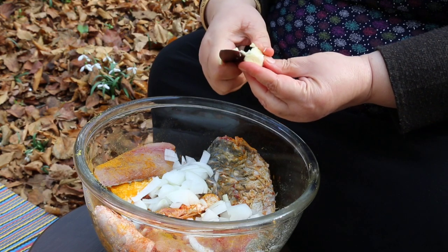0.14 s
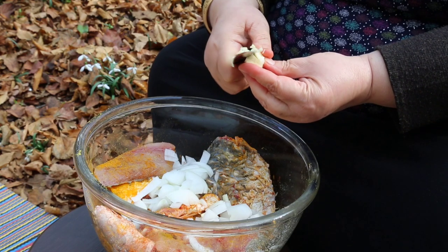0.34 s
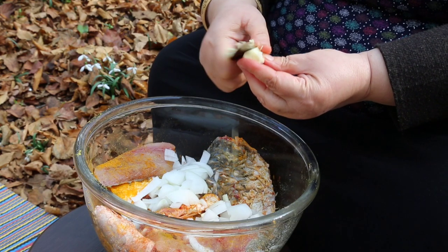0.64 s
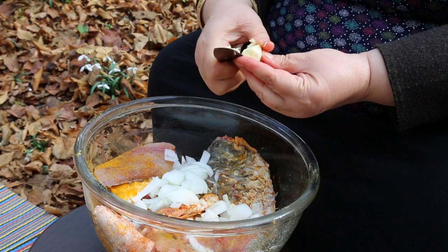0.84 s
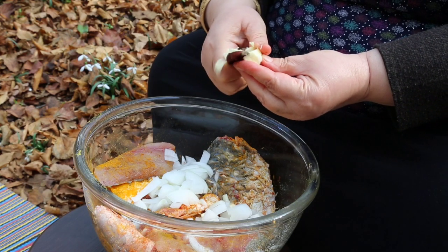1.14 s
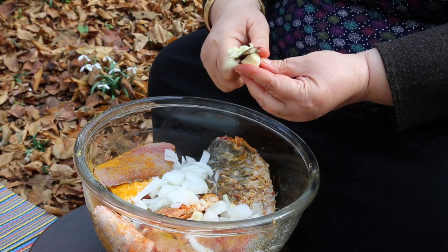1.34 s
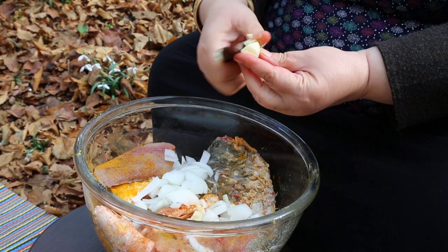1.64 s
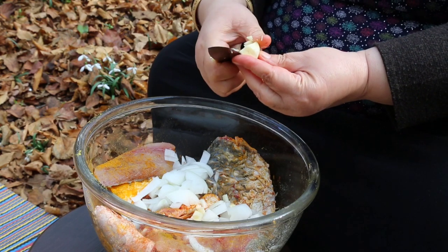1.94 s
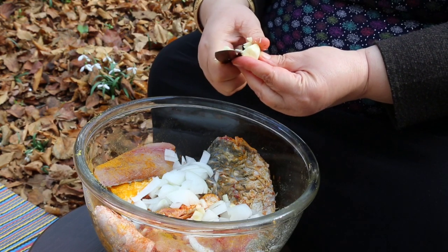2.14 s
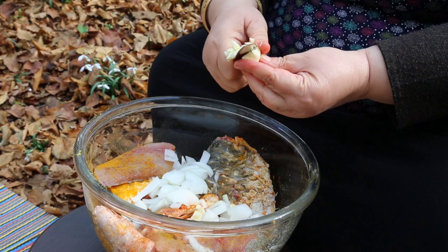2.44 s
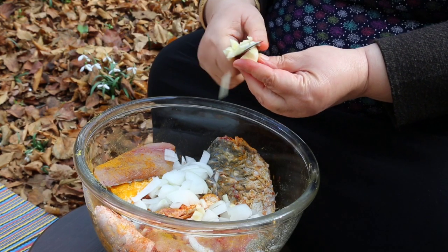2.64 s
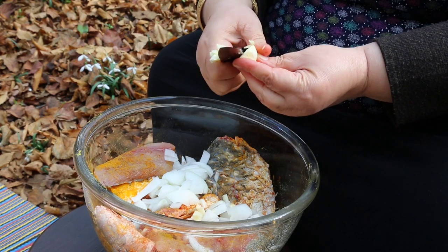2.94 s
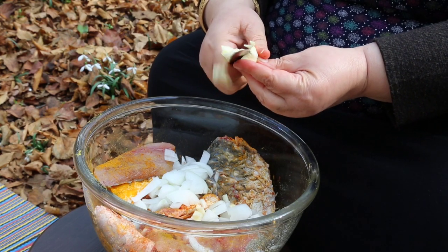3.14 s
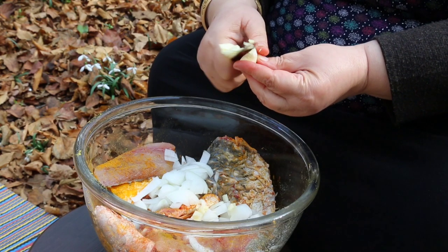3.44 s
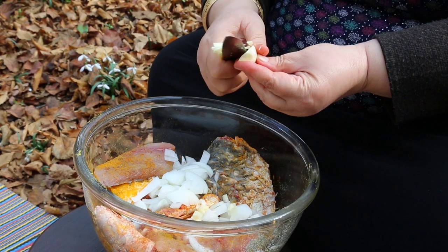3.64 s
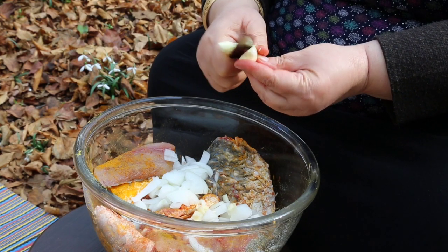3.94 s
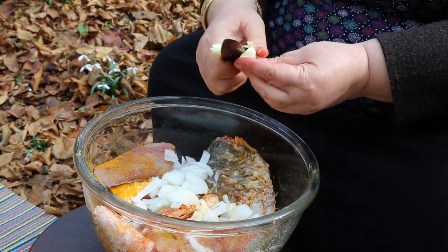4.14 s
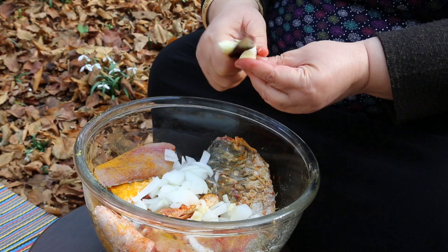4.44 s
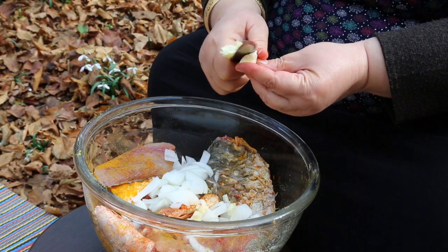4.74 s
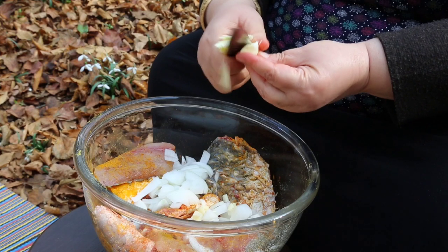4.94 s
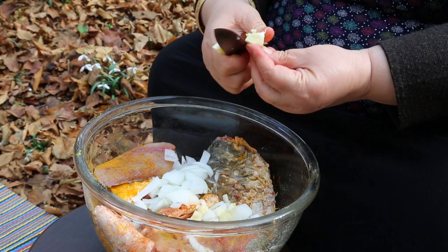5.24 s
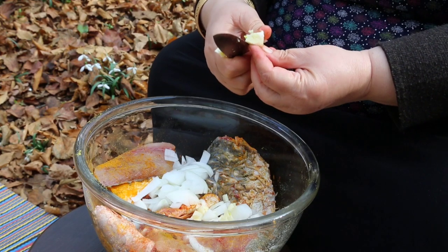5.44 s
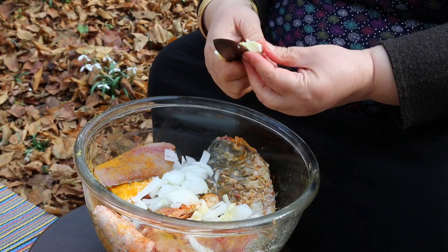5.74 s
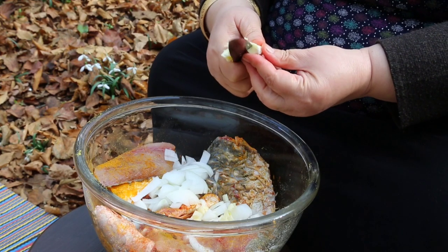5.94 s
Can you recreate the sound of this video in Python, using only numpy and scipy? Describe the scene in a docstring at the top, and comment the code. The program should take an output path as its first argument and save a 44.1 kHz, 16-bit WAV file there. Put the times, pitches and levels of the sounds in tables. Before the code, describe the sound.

Close by, a knife cuts through a clove of garlic in short runs of quiet, moist crunching and small clicks. Around it, woodland birds warble and chirp at different distances, scattered at first, then nearer and busier, with two sharp high calls midway. The birds stand out over the cutting and a soft outdoor background of air and distant leaves.

```python
"""Woodland birds warble quick whistled glides, with hazy trills and thin high calls among them.
Each note is a frequency-modulated tone, smeared by sound scattered off the trunks. Close by, at a
picnic, a knife slices a garlic clove: bursting cells crackle wetly and tough fibres snap.
Under it lie rumbling air, microphone hiss, murmuring leaves, a far drone, a faint electric whine
and soft wind bumps."""
import sys
import numpy as np
from scipy import signal
from scipy.fft import rfft, irfft, next_fast_len
from scipy.io import wavfile
from scipy.ndimage import uniform_filter1d, map_coordinates

SR = 44100
rng = np.random.default_rng(int(sys.argv[2]) if len(sys.argv) > 2 else 0)


def put_to_file(sound):
    """Save the sound as 16-bit audio at rate SR, in the file named by the first command-line argument."""
    columns = np.atleast_2d(sound).T  # one column per channel
    safe = np.clip(columns, -1, 1)
    whole_steps = np.round(safe * 32767)
    wavfile.write(sys.argv[1], SR, whole_steps.astype(np.int16))


N = 268114
TIME = np.arange(N) / SR


def amp(db):
    return 10 ** (np.asarray(db) / 20)


def curves(rows):
    """Linear interpolation in time: one value per sample for each column after the first."""
    times, *columns = np.transpose(rows)
    return [np.interp(TIME, times, column) for column in columns]


def wobble(rate):
    """Smooth random modulation: a spline through `rate` Gaussian knots a second."""
    knots = rng.standard_normal(int(N * rate / SR) + 4)
    return map_coordinates(knots, [TIME * rate])


def filtered(x, response):
    """Linear filtering: the spectrum is multiplied by a frequency response."""
    size = next_fast_len(N + SR // 2)
    return irfft(rfft(x, size) * response(np.fft.rfftfreq(size, 1 / SR)), size)[:N]


def noise(spectrum, envelope=1):
    """Spectral shaping: white noise times an envelope is filtered, then scaled to unit RMS."""
    freqs, db = np.transpose(spectrum)
    gain = lambda hz: amp(np.interp(np.log(hz + 1), np.log(freqs + 1), db))
    shaped = filtered(envelope * rng.standard_normal(N), gain)
    return shaped / np.sqrt(np.mean(shaped ** 2) + 1e-20)


def syllables(rows, start_db=-5.5, end_db=-3):
    """Three-point contours (t, f, level): a slide to the loudest point, the turn, then a drift."""
    return [[(start, f0, db + start_db), (start + slide, f1, db),
             (start + slide + drift, f2, db + end_db)]
            for start, slide, drift, f0, f1, f2, db in rows]


def whistles(notes, edge_s, waver_hz, flutter_db, rasp):
    """Frequency and amplitude modulation: each note glides, hazed by the sidebands of a fast tremble."""
    out = np.zeros(N)
    waver = waver_hz * wobble(150)
    flutter = amp(flutter_db * wobble(120)) * (1 + rasp * wobble(1500))
    for contour in notes:
        times, hz, db = np.transpose(sorted(contour))
        span = np.arange(max(round((times[0] - edge_s) * SR), 0),
                         min(round((times[-1] + edge_s) * SR), N))
        t = TIME[span]
        glide = uniform_filter1d(np.interp(t, times, hz), size=120, mode="nearest")  # rounds the turns
        tone = np.sqrt(2) * np.sin(2 * np.pi * np.cumsum(glide + waver[span]) / SR)
        ramp = np.clip(np.minimum(t - t[0], t[-1] - t) / (2 * edge_s), 0, 1)
        envelope = amp(np.interp(t, times, db)) * np.sin(np.pi / 2 * ramp) ** 2
        out[span] += envelope * flutter[span] * tone
    return out


def among_trunks(x, direct_db, near_db, far_db, near_t60, far_t60=0.32):
    """Multiple scattering: dense near echoes and a longer tail join the direct sound (T60 in s)."""
    t = np.arange(SR // 2) / SR
    onset = np.clip(t / 0.0042, 0, 1)
    near, far = onset * amp(-60 * t / near_t60), onset * amp(-60 * t / far_t60)
    decay = np.hypot(amp(near_db) * near / np.linalg.norm(near), amp(far_db) * far / np.linalg.norm(far))
    echoes, step = np.zeros(N + SR), SR // 4
    for start in range(0, N, step):  # every quarter second meets new scatterers
        echo = signal.fftconvolve(x[start:start + step], decay * rng.standard_normal(len(t)))
        echoes[start:start + len(echo)] += echo
    return amp(direct_db) * x + echoes[:N]


# Warbled syllables: t/s, slide/s, drift/s, start f/Hz, turn f/Hz, end f/Hz, relative level/dB
WARBLES = [(0, 0.013, 0.026, 3180, 3505, 3810, -46.5), (.008, 0.0087, 0.021, 5030, 4580, 4590, -50),
           (.05, .012, 0.014, 2890, 3360, 3960, -52), (.085, 0.0082, 0.013, 3140, 2890, 2850, -57.5),
           (.118, 0.016, 0.02, 4170, 3490, 3180, -62.5), (0.597, 0.0087, 0.016, 2850, 3220, 5200, -61),
           (.622, .004, .01, 5140, 5100, 5000, -55.5), (.626, 0.018, 0.023, 4750, 3950, 3885, -46.5),
           (.672, 0.009, 0.016, 3960, 3500, 3720, -51.5), (.697, 0.0084, 0.026, 3790, 3140, 3460, -56.5),
           (0.757, 0.019, 0.052, 2510, 3210, 3145, -56), (.893, .005, 0.015, 3100, 3250, 3480, -57.5),
           (.909, 0.011, 0.012, 3600, 5720, 5400, -56), (0.932, 0.013, 0.016, 5200, 3970, 3580, -54.5),
           (.975, 0.022, 0.0067, 3320, 3380, 4500, -57.5), (1.008, 0.011, .012, 3620, 3600, 2820, -55.5),
           (1.034, .008, .012, 2900, 3210, 3190, -65), (1.16, 0.075, 0.065, 4380, 4330, 3960, -67.5),
           (1.302, .013, .015, 3890, 5840, 5200, -48), (1.322, 0.019, 0.004, 3720, 4910, 5000, -46),
           (1.33, 0.012, .013, 5180, 5630, 4060, -43.5), (1.358, 0.019, 0.014, 4260, 5800, 4260, -51.5),
           (1.397, .028, 0.019, 3350, 3890, 4030, -52), (1.439, .023, 0.022, 4100, 4650, 4750, -50.5),
           (1.612, 0.011, .022, 3250, 5710, 5400, -62), (1.715, 0.028, .01, 3600, 3830, 4620, -67),
           (1.95, .025, 0.011, 3360, 3900, 3900, -66.5), (1.99, .01, 0.061, 4370, 4260, 4370, -65),
           (2.11, 0.06, 0.14, 3800, 3740, 3910, -68.5), (2.208, .002, 0.0027, 6060, 5630, 5100, -55),
           (2.266, 0.0026, 0.0027, 6130, 5600, 5040, -56), (2.33, 0.0025, 0.0026, 6000, 5370, 4700, -54.5),
           (2.325, 0.022, 0.0063, 2850, 3340, 3230, -60), (2.356, 0.025, .05, 2980, 3950, 3780, -35),
           (2.43, 0.047, .05, 3800, 3698, 3500, -40), (2.37, 0.021, 0.11, 4450, 4287, 3960, -39.5),
           (2.445, 0.0071, 0.0084, 5200, 5140, 5400, -52.5), (2.525, .02, 0.021, 3170, 3820, 3966, -33.5),
           (2.57, 0.027, 0.065, 3960, 3870, 3862, -41.5), (2.721, 0.013, 0.02, 4020, 3430, 2940, -60.5),
           (2.838, 0.023, .01, 4820, 3000, 3900, -62), (2.973, 0.0069, 0.026, 3715, 4760, 4960, -45),
           (3, 0.0073, 0.0078, 4920, 3910, 3270, -47), (3.005, 0.034, 0.025, 4690, 5050, 4350, -50),
           (3.041, 0.03, .009, 3154, 4030, 3080, -45.5), (3.096, 0.018, 0.026, 2870, 3185, 3950, -48),
           (3.125, 0.0065, 0.012, 2980, 2997, 3300, -41.5), (3.145, 0.0066, 0.0066, 2780, 3170, 3840, -35),
           (3.172, 0.0076, 0.014, 3070, 3570, 3606, -31), (3.198, .008, 0.043, 3580, 2867, 2772, -36),
           (3.23, 0.007, 0.0035, 4230, 4600, 4670, -50), (3.25, 0.018, 0.021, 2827, 3550, 3600, -42),
           (3.289, .012, 0.0071, 3596, 3270, 3440, -39.5), (3.312, 0.0057, 0.012, 3740, 2800, 3140, -37.5),
           (3.65, 0.02, .014, 3900, 5520, 4960, -53.5), (3.673, 0.025, 0.0094, 3656, 5800, 4440, -44),
           (3.705, 0.007, 0.014, 4580, 5180, 3960, -46.5), (3.72, 0.019, 0.018, 3030, 2880, 2850, -61.5),
           (3.75, 0.0092, .01, 3410, 3890, 3950, -46.5), (3.767, 0.025, 0.031, 3150, 4430, 4500, -46),
           (3.828, .035, .022, 4480, 4960, 5500, -51), (3.849, 0.0055, 0.03, 3950, 4045, 4090, -32.5),
           (3.868, 0.011, 0.023, 2620, 2624, 2563, -55), (3.881, .009, 0.02, 4250, 4920, 4463, -37.5),
           (3.908, 0.00784, 0.0066, 4750, 3880, 3420, -33), (3.928, 0.033, 0.046, 2790, 4170, 4545, -47.5),
           (4, 0.018, 0.032, 4520, 4430, 4600, -53), (4.2, .03, 0.009, 3800, 3070, 3100, -62.5),
           (4.262, .023, 0.016, 2830, 3250, 3080, -63), (4.379, 0.01, 0.0096, 3720, 4570, 5340, -43.5),
           (4.397, 0.011, 0.006, 4740, 4030, 4080, -38.5), (4.418, 0.0066, 0.0097, 4260, 4650, 4100, -43),
           (4.428, 0.012, 0.019, 3160, 3650, 3820, -46), (4.456, 0.0088, 0.011, 3950, 3430, 3395, -40),
           (4.48, 0.011, 0.022, 2970, 3363, 2570, -47.5), (4.55, 0.017, .006, 4380, 4520, 4560, -61),
           (4.576, 0.017, .01, 3110, 3410, 4260, -51), (4.602, 0.011, 0.026, 4510, 4450, 4250, -45),
           (4.645, 0.013, 0.018, 4140, 3860, 3260, -45.5), (4.599, .025, .025, 4650, 4800, 4570, -62),
           (5, 0.028, 0.014, 3190, 3250, 4350, -61.5), (5.025, .015, 0.0069, 2770, 3250, 3340, -61),
           (5.05, 0.0052, 0.02, 4410, 4540, 3550, -54), (5.085, 0.0039, 0.0038, 4440, 4550, 4770, -53),
           (5.12, 0.021, 0.017, 2810, 3050, 3620, -59), (5.154, 0.0046, 0.01, 3670, 3600, 3330, -58),
           (5.245, 0.0086, 0.017, 3020, 3650, 4670, -52.5), (5.266, .01, 0.02, 4510, 4920, 5220, -42.5),
           (5.295, 0.0064, 0.0039, 4920, 4110, 3460, -42), (5.308, 0.0068, .01, 3520, 4040, 4040, -51),
           (5.31, .025, .01, 5000, 5170, 4570, -54), (5.33, 0.02, 0.013, 3260, 4510, 3470, -47),
           (5.385, 0.0118, .013, 2960, 3300, 3920, -45), (5.412, 0.011, .01, 3870, 3010, 2790, -51),
           (5.44, 0.013, .008, 3330, 3580, 3700, -67)]
# Phrases sung close by: start t/s, end t/s
CLOSE_PHRASES = [(2.32, 2.7), (3.09, 3.35), (3.84, 3.92), (4.57, 4.7)]

def warblers():
    """Direct-to-reverberant ratio: the farther song has less direct sound against its echoes."""
    close_rows = [row for row in WARBLES if any(start <= row[0] < end for start, end in CLOSE_PHRASES)]
    far_rows = [row for row in WARBLES if row not in close_rows]
    close = whistles(syllables(close_rows), edge_s=0.002, waver_hz=25.3, flutter_db=2.5, rasp=0.15)
    far = whistles(syllables(far_rows), edge_s=0.002, waver_hz=67.5, flutter_db=2.5, rasp=0.25)
    return (among_trunks(close, direct_db=0, near_db=-3.5, far_db=-10.5, near_t60=0.11)
            + among_trunks(far, direct_db=-1.5, near_db=-2, far_db=-24.5, near_t60=0.19))


# Far trills: t/s, duration/s, start f/Hz, end f/Hz, relative level/dB
TRILLS = [(0, 0.087, 3675, 3500, -61), (.14, .2, 1995, 1900, -72), (0.631, .1, 4730, 3400, -59.5),
          (0.841, .06, 3510, 3300, -65.5), (1.31, .085, 4870, 4500, -54), (1.407, .075, 3696, 4520, -52),
          (1.96, .12, 3950, 4020, -69.5), (3.667, 0.063, 5010, 4800, -55), (3.79, 0.088, 4200, 4300, -56),
          (3.928, .12, 3900, 4500, -62), (4.384, 0.11, 4664, 2900, -50), (5.07, 0.041, 3900, 3420, -66),
          (5.303, 0.081, 4500, 4350, -59), (5.47, 0.11, 4270, 4350, -68.5), (5.9, 0.2, 3490, 3290, -66.5)]

def trillers():
    """Spectral broadening: deep random modulation blurs tones heard mostly by way of the trunks."""
    notes = [[(start, f0, db), (start + length, f1, db)] for start, length, f0, f1, db in TRILLS]
    trills = whistles(notes, edge_s=0.008, waver_hz=279.2, flutter_db=3.5, rasp=0.41)
    return among_trunks(trills, direct_db=-6, near_db=-1, far_db=-10, near_t60=0.1)


# Spectrum of far rumble and microphone hiss: f/Hz, relative level/dB
AIR_SPECTRUM = [(12, -50), (20, -33), (122, 1), (206, -6), (288, -7.5), (851, -16), (1610, -17.5),
                (2590, -21.5), (4380, -20.5), (6470, -25), (10700, -26.5), (14100, -31.5), (15300, -29.5)]

def air():
    """Broadband noise floor: rumble and hiss drift slightly in level together."""
    return amp(-61 + 1.07 * wobble(2.133)) * noise(AIR_SPECTRUM)


# Murmur in the treetops: t/s, level/dB
LEAF_LEVELS = [(0, -77), (.2, -70), (1.5, -71), (2.2, -78.5), (2.95, -72), (3.28, -67.5), (3.6, -79),
               (3.94, -68.5), (4.8, -80.5), (6.08, -73)]

def leaves():
    """Amplitude-modulated noise: the midrange murmur of far leaves swells and sinks."""
    db, = curves(LEAF_LEVELS)
    return amp(db) * noise([(300, -4), (700, -9.5), (1900, -1), (2800, -7), (5000, -43)])


# Distant droning: t/s, f/Hz, level/dB
DRONE_CONTOUR = [(0, 105, -73), (1.3, 122, -72.5), (2.5, 108, -65), (3.3, 118, -63), (3.8, 136, -70.5),
                 (6.08, 140, -64.5)]

def drone():
    """Narrow-band modulation: one low tone wanders in frequency and level."""
    hz, db = curves(DRONE_CONTOUR)
    level = amp(db + 3 * wobble(13))
    return level * np.sin(2 * np.pi * np.cumsum(hz + 8 * wobble(12)) / SR)


# Electric whine: f/Hz, peak level/dB
WHINE_TONES = [(15704, -75)]

def whine():
    """Simple harmonic oscillation: a faint, steady electric tone."""
    return sum(amp(db) * np.sin(2 * np.pi * hz * TIME) for hz, db in WHINE_TONES)


# Wind bumps on the microphone: centre t/s, 1/e half width/s, peak level/dB
WIND_BUMPS = [(.07, 0.015, -35.5), (.17, 0.021, -48.5), (5.47, 0.022, -47.5), (5.632, 0.011, -46.5)]

def wind(bump_hz=50.4, breeze_db=-74):
    """Pressure fluctuation at the microphone: low noise stirs between Gaussian tone pulses."""
    stirring = noise([(15, -44), (35, 2.5), (70, 4), (130, -10), (300, -68)])
    out = amp(breeze_db + 3.8 * wobble(6.9)) * stirring
    for centre, half_width, db in WIND_BUMPS:
        t = TIME - centre
        out -= amp(db) * np.exp(-(t / half_width) ** 2) * np.cos(2 * np.pi * bump_hz * t)
    return out


# Knife strokes through the clove: t/s, duration/s, level/dB
STROKES = [(0.317, 0.011, -60), (0.331, 0.16, -56.5), (1.003, .006, -63), (1.014, .024, -59.5),
           (1.07, .022, -58.5), (1.122, 0.06, -58), (1.184, 0.054, -57), (1.247, .019, -57),
           (1.289, 0.11, -58), (1.522, 0.008, -61), (1.542, 0.012, -59), (1.687, 0.02, -61),
           (2.151, .017, -54), (2.194, .037, -58), (2.251, .038, -57), (2.298, 0.036, -58),
           (2.381, 0.1, -54), (2.537, 0.019, -64), (2.643, 0.0063, -60), (2.672, 0.01, -62),
           (3.11, .014, -62), (3.136, 0.038, -60), (3.185, 0.14, -60.5), (3.318, .008, -63),
           (3.37, .007, -65), (3.767, 0.042, -62), (3.81, 0.095, -58.5), (4.254, 0.027, -63.5),
           (4.283, 0.11, -58), (4.46, .007, -63), (4.705, 0.047, -61), (4.747, .1, -61),
           (4.862, 0.011, -62), (5.981, 0.054, -54)]
# Spectrum of bursting cells: f/Hz, relative level/dB
CELL_SPECTRUM = [(1470, -27), (2500, -4.5), (3760, -4.5), (4280, -5.5), (4650, -13), (5330, -1.5),
                 (6960, -5.5), (7680, -2.5), (15300, -7)]

def knife(swell_share=0.4):
    """Granular noise: cells burst in a fizz that swells and fades with each stroke of the blade."""
    envelope = np.zeros(N)
    for start, length, db in STROKES:
        triangle = np.interp(TIME, [start, start + swell_share * length, start + length], [0, 1, 0])
        envelope += amp(db) * triangle ** 0.59
    graininess = amp(3 * wobble(600) + 1.5 * wobble(70))
    return envelope * noise(CELL_SPECTRUM, graininess)


# Single fibres snapping: t/s, relative level/dB
FIBRE_SNAPS = [(.3501, -53), (.388, -59), (0.4533, -47), (1.1483, -48), (1.203, -55), (1.2544, -49),
               (1.3179, -50), (1.5228, -44.5), (1.5436, -52), (1.68, -42.5), (2.1545, -64), (2.3155, -48),
               (2.3903, -41.5), (2.4234, -62), (2.6723, -48.5), (3.159, -58), (3.8728, -62), (4.4618, -58),
               (4.832, -47), (5.9915, -57)]

def fibres(body_db=-10, highpass_hz=1500):
    """Fracture transients: each tough fibre gives a treble crack over the clove's duller tick."""
    cracks, t = np.zeros(N + SR), np.arange(900) / SR
    decay = amp(-60 * t / 0.0055) + 0.14 * amp(-60 * t / 0.049)
    for start, db in FIBRE_SNAPS:
        burst = rng.standard_normal(len(t)) * decay
        treble = np.diff(burst, prepend=0)
        cracks[round(start * SR):][:len(t)] += amp(db) * (treble + amp(body_db) * burst)
    return filtered(cracks[:N], lambda hz: hz ** 2 / (hz ** 2 + highpass_hz ** 2))


# Thin high notes: t/s, slide/s, drift/s, start f/Hz, turn f/Hz, end f/Hz, relative level/dB
THIN_NOTES = [(1.66, 0.068, 0.068, 8770, 8310, 7880, -66.5), (2.01, 0.03155, .03, 6240, 6300, 6640, -66),
              (2.075, 0.0054, 0.0044, 8230, 7300, 6460, -50.5), (2.095, .055, 0.034, 8100, 8170, 8360, -69),
              (2.22, 0.026, .015, 6120, 6270, 6420, -63), (2.29, .01, 0.048, 8200, 8220, 8160, -66),
              (3.442, .04, 0.108, 9430, 8590, 8370, -49.5), (3.605, 0.011, .03, 8000, 7930, 7940, -50.5),
              (3.645, 0.0147, 0.016, 8030, 8530, 8300, -54), (3.675, .012, .02, 8300, 8300, 8480, -59),
              (3.712, 0.0115, 0.044, 8300, 7950, 7940, -52),
              (5.543, 0.0133, 0.019, 7110, 7550, 6300, -59.5),
              (5.593, 0.0091, .02, 7430, 7350, 7300, -57.5), (5.625, .02, .04, 7330, 7330, 7300, -71),
              (5.707, 0.0108, .017, 6550, 7900, 6460, -63.5), (5.88, .01, 0.0094, 7920, 7870, 7400, -65.5)]
# Arched calls and sharp double flicks: t/s, relative level/dB
ARCH_CALLS = [(1.988, -49.5), (2.181, -46.5)]
FLICK_CALLS = [(2.754, -32), (2.966, -36)]
# Their contours: t/s from the call's start, f/Hz, relative level/dB
ARCH_CONTOUR = [(0, 6520, -8), (.006, 7450, -1), (.028, 8040, -4.5), (0.069, 8320, 3), (.095, 8060, -16)]
FLICK_CONTOUR = [(0, 6130, -11.5), (.008, 7200, -6), (.014, 9480, -15.5), (.022, 7800, -2.5),
                 (.029, 7130, 1.5), (0.036, 7230, 2.5), (.045, 9100, -11.5), (.048, 7420, -6.5),
                 (0.056, 7600, -17)]

def high_callers():
    """Frequency sweeps: birds whistle thin high notes and repeat two fixed call contours."""
    notes = syllables(THIN_NOTES)
    for calls, contour in (ARCH_CALLS, ARCH_CONTOUR), (FLICK_CALLS, FLICK_CONTOUR):
        for start, call_db in calls:
            notes.append([(start + t, hz, call_db + db) for t, hz, db in contour])
    voices = whistles(notes, edge_s=0.003, waver_hz=48.7, flutter_db=2, rasp=0.11)
    return among_trunks(voices, direct_db=-2.5, near_db=-3, far_db=-12, near_t60=0.15)


def scene():
    """Superposition: the pressures of all sources add in one channel."""
    return (warblers() + trillers() + air() + leaves() + drone() + whine() + wind()
            + knife() + fibres() + high_callers())[None]


def record(dry, cutoff_hz=15830):
    """Band limiting: an ideal low-pass filter passes nothing above its cutoff."""
    return filtered(dry[0], lambda hz: hz < cutoff_hz)[None]


dry = scene()
out = record(dry)
put_to_file(out)
```